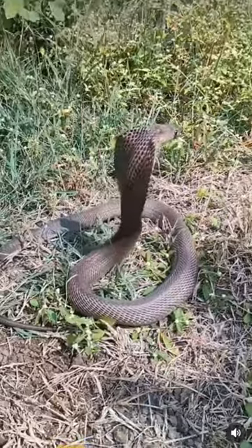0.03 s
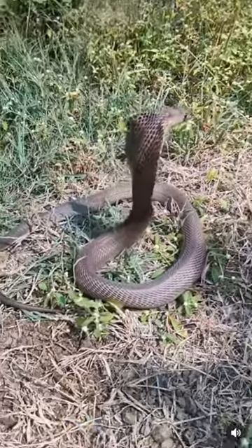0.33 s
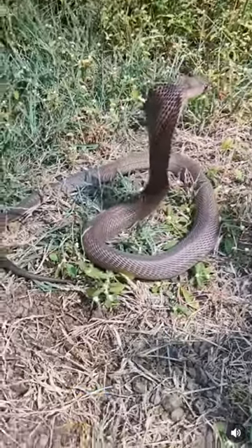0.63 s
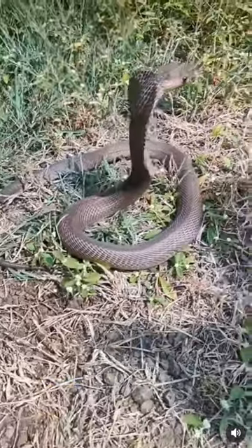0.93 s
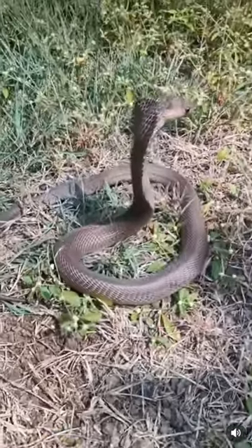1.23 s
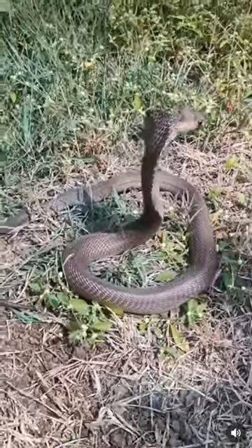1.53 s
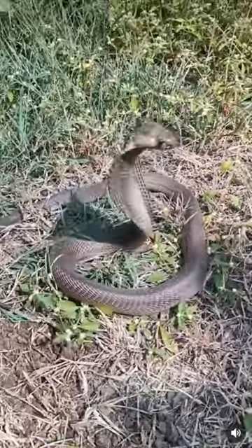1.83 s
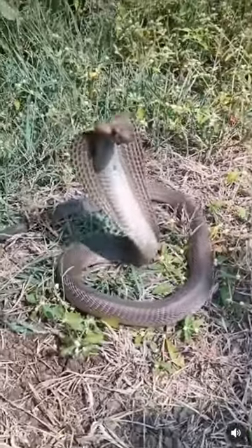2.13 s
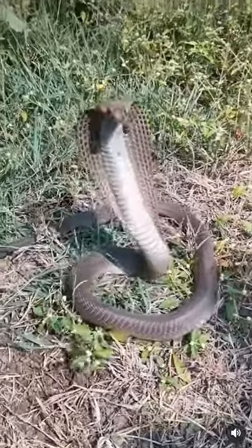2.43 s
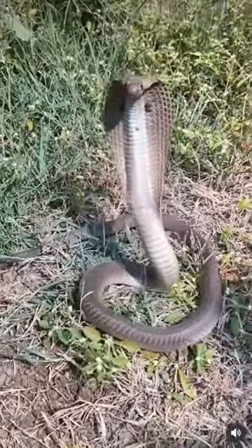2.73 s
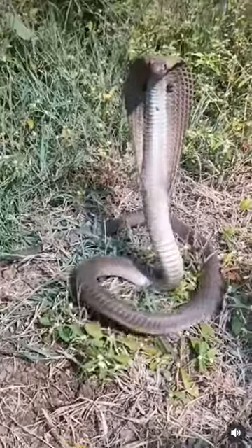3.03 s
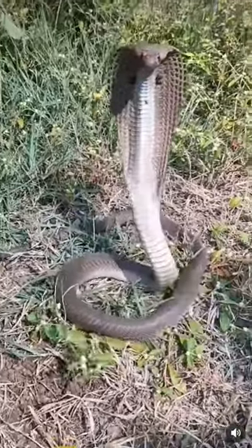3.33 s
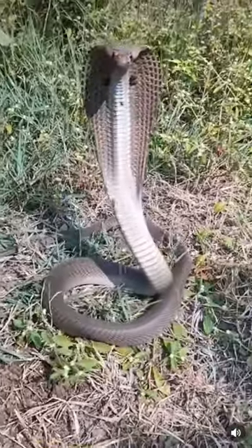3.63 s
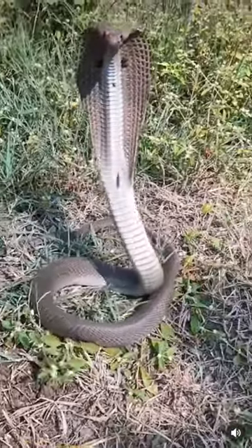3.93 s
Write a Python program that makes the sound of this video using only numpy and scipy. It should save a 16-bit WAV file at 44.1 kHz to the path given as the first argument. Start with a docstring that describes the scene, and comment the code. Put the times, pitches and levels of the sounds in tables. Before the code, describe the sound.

A cobra gives one long, bright, airy hiss that holds, then dies away. Dry grass crunches and snaps softly under its body near the start and again as the hiss fades, over a faint outdoor rumble.

```python
"""One long, bright hiss, the turbulence of air forced through a cobra's glottis, dies away as the snake,
rearing in dry grass, turns to face the microphone. A narrow resonance of its airway stands out and
rises in pitch near the end of the hiss. Under its shifting weight dry stalks crunch and snap by brittle
fracture and the soil gives soft, damped thumps, all over a faint outdoor rumble."""
import sys
import numpy as np
from scipy import signal
from scipy.fft import rfft, irfft
from scipy.io import wavfile
from scipy.ndimage import map_coordinates

SR = 44100
rng = np.random.default_rng(int(sys.argv[2]) if len(sys.argv) > 2 else 0)


def output_pcm(signal):
    """Save a mono or channel-first signal as 16-bit PCM at the path in sys.argv[1].

    Samples are clipped to [-1, 1] before scaling.
    """
    pcm = np.clip(np.atleast_2d(signal).T, -1, 1) * 32767
    wavfile.write(sys.argv[1], SR, np.round(pcm).astype(np.int16))


N = 176400
T = np.arange(N) / SR
HZ = np.maximum(np.arange(N // 2 + 1) * SR / N, 1)
CUTOFF_HZ = 15500


def from_db(db):
    """Amplitude ratio of a level in decibels."""
    return 10 ** (np.asarray(db) / 20)


def unit_rms(x):
    """Normalisation to unit mean power."""
    return x / np.sqrt(np.mean(x ** 2) + 1e-20)


def in_time(rows):
    """Linear interpolation of each column over time."""
    times, *columns = np.transpose(rows)
    return [np.interp(T, times, column) for column in columns]


def over_hz(points):
    """Interpolation of a spectrum over log frequency."""
    hz, value = np.transpose(points)
    return np.interp(np.log(HZ), np.log(hz), value)


def pan(db):
    """Constant-power panning: two gains from a balance, the left level minus the right."""
    gains = from_db(np.atleast_1d(db) * np.array([[.5], [-.5]]))
    return gains / np.sqrt(np.mean(gains ** 2, axis=0))


def add(out, start_s, x):
    """Superposition of a sound from a given time on."""
    i = max(int(start_s * SR), 0)
    out[i:i + len(x)] += x[:N - i]


def drift(corner_hz):
    """Random fluctuation: low-passed noise of unit power."""
    return unit_rms(irfft(rfft(rng.standard_normal(N)) / (1 + (HZ / corner_hz) ** 2), N))


# Likeness of left and right: (frequency [Hz], correlation [-1 to 1])
CORRELATION = [(60,0.24),(300,0.65),(2000,0.07),(7000,0.32),(10000,0.45),(15000,0.17)]
def turbulence(spectrum, flutter_db, balance_db=0):
    """Turbulent flow radiates broadband noise, partly coherent in stereo and fluttering in level."""
    alike = np.clip(over_hz(CORRELATION), -1, 1)
    mid, side = rfft(rng.standard_normal((2, N)))
    stereo = np.sqrt(1 + alike) * mid + np.sqrt(1 - alike) * side * [[1], [-1]]
    low_hz, high_hz = spectrum[0][0], 2 * spectrum[-1][0]
    skirts = 1 / (1 + (low_hz / HZ) ** 4) / (1 + (HZ / high_hz) ** 4)
    colour = from_db(over_hz(spectrum)) * skirts * (HZ < CUTOFF_HZ + 400)
    noise = unit_rms(irfft(stereo * colour * pan(balance_db), N))
    return noise * from_db(flutter_db * (drift(12.8) + 0.62 * drift(190)))


# Force of the hiss: (time [s], body level [dB], sizzle level [dB])
JET_LEVELS = [(0,-36,-40.5), (0.15,-38,-44), (0.3,-33,-35.5), (0.49,-33,-35), (0.58,-34.5,-29),
              (0.93,-35,-31), (1.08,-36.5,-35.5), (1.45,-39.5,-36.5), (1.55,-36,-33), (1.84,-37,-33.5),
              (1.92,-37.5,-39), (2.1,-39,-41.5), (2.23,-41.5,-40), (2.32,-46,-44), (2.41,-50.5,-49),
              (2.485,-48.5,-46), (2.545,-58,-61), (2.67,-58,-63), (2.74,-63.5,-67), (3.1,-62,-61.5),
              (3.4,-68,-68), (3.75,-77.5,-80), (4,-87.5,-81.5)]
# Balance as the head turns: (time [s], body balance [dB], sizzle balance [dB])
HEAD_TURN = [(0,8,5.5),(.45,9.5,-0.5),(.6,4,-11.5),(2.15,5,-14.5),(2.38,5,-5),(3,6.5,-3)]
# Spectra of the body and of the sizzle above it: (frequency [Hz], relative level [dB])
BODY_SPECTRUM = [(1200,-44),(2400,-0.5),(3500,2),(5000,4.5),(5800,2.5),(9300,1),(11000,-4.5)]
SIZZLE_SPECTRUM = [(7500,-22.5),(9200,-11),(10200,-16.5),(11400,-7),(14000,-7.5),(14700,0),(15150,0.5),(15600,3)]
# Further tilt of the body between left and right: (frequency [Hz], balance [dB])
BODY_BALANCE = [(2700,-6.5),(3500,-9.5),(4500,-8.5),(5400,-6),(6800,-6),(8100,-6.5),(9300,-14.5)]
def glottal_jet():
    """Jet noise is directional, so the balance of body and sizzle shifts as the head turns."""
    body_db, sizzle_db = in_time(JET_LEVELS)
    body_pan, sizzle_pan = in_time(HEAD_TURN)
    body = turbulence(BODY_SPECTRUM, flutter_db=1.0, balance_db=over_hz(BODY_BALANCE))
    sizzle = turbulence(SIZZLE_SPECTRUM, flutter_db=0.87)
    return from_db(body_db) * pan(body_pan) * body + from_db(sizzle_db) * pan(sizzle_pan) * sizzle


# Strength of the low rush of air: (time [s], level [dB])
RUSH_LEVEL = [(.15,-52),(.35,-46.5),(1.1,-51.5),(1.2,-54.5),(1.4,-53),(2.2,-49),(2.3,-54),(2.65,-61),(3.35,-65.5),(3.72,-83)]
# Its spectrum: (frequency [Hz], relative level [dB])
RUSH_SPECTRUM = [(430,-9),(620,3),(1000,3),(1350,0.5),(1800,2.5),(2300,-0.5),(3400,-27)]
def breath_rush():
    """Turbulence in the breath adds a lower band of noise beneath the hiss."""
    rush_db, = in_time(RUSH_LEVEL)
    return from_db(rush_db) * pan(db=-8) * turbulence(RUSH_SPECTRUM, flutter_db=1.5)


def resonance(centre_hz, width_hz, wander=0.013):
    """A cavity driven by turbulence rings as narrowband noise, here wavering in pitch."""
    phase = 2 * np.pi * np.cumsum(centre_hz * (1 + wander * drift(corner_hz=6))) / SR
    lowpass = signal.butter(2, width_hz / 2, fs=SR, output="sos")
    in_phase, quadrature = signal.sosfilt(lowpass, rng.standard_normal((2, N)))
    return unit_rms(in_phase * np.cos(phase) + quadrature * np.sin(phase))


# Main airway resonance: (time [s], centre [Hz], level [dB])
MAIN_RESONANCE = [(0,7000,-59),(1.0,6740,-48.5),(1.2,6740,-41),(1.83,6865,-38),(2.03,7240,-43),(2.17,7540,-60),(2.35,8000,-49.5),(2.48,8200,-52.5),(2.55,7440,-67.5),(4,7440,-89)]
# Lesser resonances: (start [s], end [s], centre [Hz], bandwidth [Hz], peak level [dB], balance [dB])
LESSER_RESONANCES = [(-.1,0.48,3644,562,-44.5,-6.5),(.25,1.0,4470,1200,-50,-33.5),(.9,1.98,3514,495,-48,1.5),(0.994,1.946,4600,646,-44.5,-7.5),(1.265,2.315,1732,297,-53.5,-6),(2.206,2.55,1134,353,-52.5,-6)]
def airway():
    """Cavity resonance favours narrow bands: a high one glides while lower ones swell and fade."""
    centre_hz, main_db = in_time(MAIN_RESONANCE)
    out = from_db(main_db) * pan(db=-15) * resonance(centre_hz, width_hz=620)
    for start, end, hz, width_hz, db, balance_db in LESSER_RESONANCES:
        progress = np.clip((T - start) / (end - start), 0, 1)
        swell = np.sqrt(np.abs(np.sin(np.pi * progress)))
        out += from_db(db) * swell * pan(balance_db) * resonance(hz, width_hz)
    return out


def shifting_colour(x, depth_db=1.5, patch_hz=299.5, patch_s=0.119, size=512):
    """Random spectral modulation: narrow bands swell and sink, faintly shifting the hiss's colour."""
    hz, times, bands = signal.stft(x, SR, nperseg=size)
    field = rng.standard_normal((size, size))
    grid = np.meshgrid(hz / patch_hz, times / patch_s, indexing="ij")
    patches = map_coordinates(field, grid, order=3, mode="wrap")
    return signal.istft(bands * from_db(depth_db * patches), SR, nperseg=size)[1][:, :N]


def arrival_delay(x, lag_s=0.000264):
    """Path difference: sound from the right reaches the left microphone later."""
    left = irfft(rfft(x[0]) * np.exp(-2j * np.pi * HZ * lag_s), N)
    return np.array([left, x[1]])


# Strength of the outdoor rumble: (time [s], level [dB])
RUMBLE_LEVEL = [(0,-55.5),(.35,-55),(1.05,-58.5),(1.45,-66.5),(1.8,-70.5),(2.15,-55),(2.6,-66),(3.3,-63.5),(3.6,-74.5)]
# Its spectrum: (frequency [Hz], relative level [dB])
RUMBLE_SPECTRUM = [(30,-9.5),(80,3),(230,-9.5),(480,-1),(900,-8.5)]
def outdoor_rumble():
    """Ambient noise, mostly low in frequency, slowly rises and falls."""
    rumble_db, = in_time(RUMBLE_LEVEL)
    return from_db(rumble_db) * pan(db=-5) * turbulence(RUMBLE_SPECTRUM, flutter_db=0.5)


# Crushed stalks: (start [s], nominal length [s], level [dB], low edge [Hz], top edge [Hz])
STALK_CRUNCHES = [(0.231,0.027,-41.5,380,900),(0.279,0.031,-39.5,282,850),(0.311,0.095,-41,298,1870),(0.435,0.021,-41,480,1320),(0.517,0.047,-46.5,436,1780),(0.559,0.27,-59,263,750),(0.98,0.11,-55.5,380,915),
                  (2.137,0.012,-44,450,1460),(2.504,0.021,-47.5,300,1320),(2.755,0.014,-48.5,900,1480),(2.775,0.037,-50.5,416,1390),(2.887,0.014,-59,500,1740),(2.941,0.034,-54.5,395,1900),(2.995,0.026,-47.5,345,910),
                  (3.021,0.046,-56,390,2170),(3.066,0.01,-47,483,2690),(3.173,0.0085,-49.5,330,2220),(3.2,0.034,-46.5,397,1920),(3.237,0.024,-47.5,220,1190),(3.315,0.12,-66,550,1860),
                  (3.595,0.028,-66,450,1860),(3.878,0.053,-60,272,1360)]
def crunches(cracks_per_length=40, spread_db=2.5):
    """Brittle fracture: a swell of tiny random cracks, in a band set by the stalks' thickness."""
    out, t = np.zeros(N), T[:SR]
    for start, length, db, low_hz, top_hz in STALK_CRUNCHES:
        chance, size, sign = rng.random((3, len(t)))
        breaks = chance < cracks_per_length / (length * SR)
        cracks = breaks * from_db(-spread_db * np.log(size + 0.024)) * np.sign(sign - .5)
        swell = (t / length) * np.exp(-2 * (t / length) ** 2)
        crunch = signal.lfilter(*signal.butter(2, low_hz, "high", fs=SR), cracks * swell + 1e-18)
        crunch = signal.lfilter(*signal.butter(3, top_hz, fs=SR), crunch)
        rms = np.sqrt(np.sum(crunch ** 2) / (length * SR) + 1e-20)
        add(out, start, from_db(db) * crunch / rms)
    return out


def damped_ring(force, hz, q, top_hz):
    """Response of a damped oscillator, dulled above top_hz and scaled to unit peak."""
    ring = signal.lfilter(*signal.iirpeak(hz, q, fs=SR), force + 1e-18)
    ring = signal.lfilter(*signal.butter(2, min(top_hz, SR / 3), fs=SR), ring)
    return ring / np.abs(ring).max()


# Weight settling on the soil: (time [s], peak level [dB])
SOIL_THUMPS = [(0.294,-44),(0.344,-36),(2.148,-49),(3.216,-33.5)]
def thumps(attack_s=0.002, decay_s=0.011):
    """Heavy damping in the soil turns a brief, rough push into a dull shudder."""
    out, t = np.zeros(N), T[:SR // 5]
    for start, db in SOIL_THUMPS:
        push = rng.standard_normal(len(t)) * (1 - np.exp(-t / attack_s)) * np.exp(-t / decay_s)
        add(out, start, from_db(db) * damped_ring(push, hz=135, q=0.9, top_hz=520))
    return out


# Single stalks breaking: (time [s], peak level [dB], resonance [Hz])
STALK_SNAPS = [(.296,-25.5,1110),(.344,-33,725),(0.384,-23,1600),(0.392,-28,2280),(2.144,-30.5,840),(2.509,-34,680),(2.71,-30,1250),(2.798,-38,530),(3.397,-41,1260),(3.536,-48,1280),(3.543,-50.5,3200),(3.597,-47,1140)]
def snaps():
    """Impulse response: a stalk breaks with one click and rings for about a cycle."""
    out, click = np.zeros(N), signal.unit_impulse(SR // 20)
    for start, db, hz in STALK_SNAPS:
        add(out, start, from_db(db) * damped_ring(click, hz, q=1.32, top_hz=0.88 * hz))
    return out


def grass_scatter(x, scatter_db=-10, decay_s=0.008):
    """Scattering by nearby stalks adds a short, bright tail to ground sounds from the right."""
    t = T[:SR // 10]
    response = rng.standard_normal((2, len(t))) * np.exp(-t / decay_s)
    response /= np.sqrt(np.sum(response ** 2, axis=1, keepdims=True))
    bright = signal.lfilter(*signal.butter(1, 500, "high", fs=SR), x)
    tail = signal.fftconvolve(bright[None], response)[:, :N]
    return pan(db=-5) * (x + from_db(scatter_db) * tail)


def scene():
    """Superposition of the hiss, the rumble and the ground sounds."""
    rumble = outdoor_rumble()
    hiss = shifting_colour(glottal_jet() + breath_rush() + airway())
    ground = crunches() + thumps() + snaps()
    return arrival_delay(hiss) + rumble + grass_scatter(ground)


def record(dry):
    """Band limiting: a steep elliptic low-pass removes the highest treble."""
    return signal.sosfilt(signal.ellip(12, .2, 80, CUTOFF_HZ, fs=SR, output="sos"), dry)


dry = scene()
out = record(dry)
output_pcm(out)
```